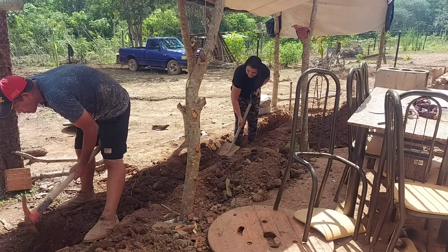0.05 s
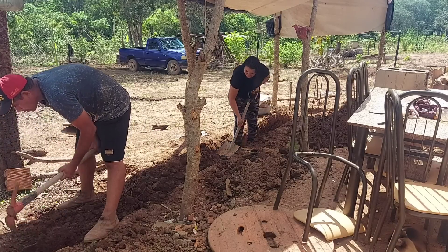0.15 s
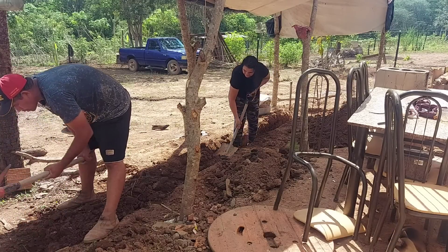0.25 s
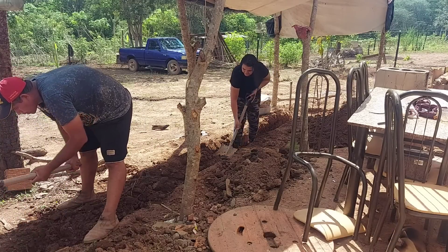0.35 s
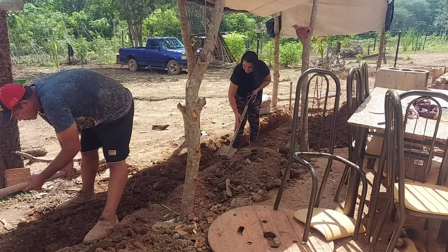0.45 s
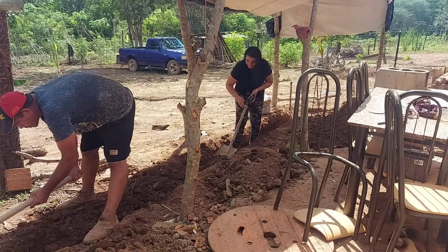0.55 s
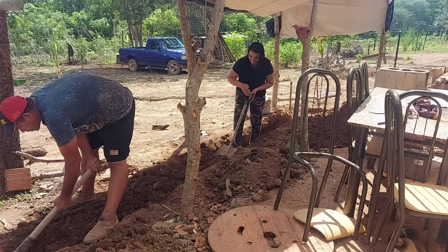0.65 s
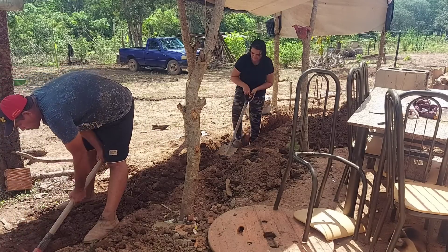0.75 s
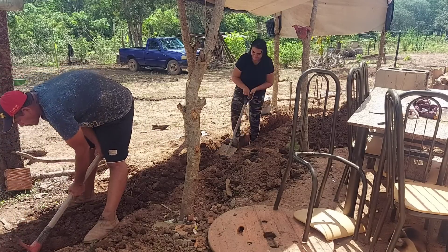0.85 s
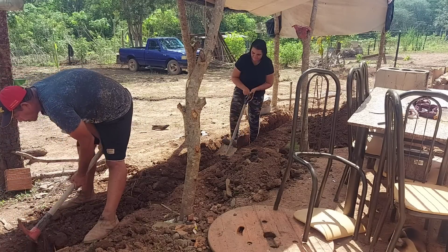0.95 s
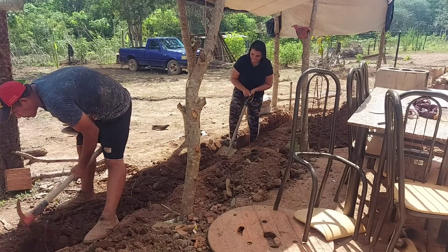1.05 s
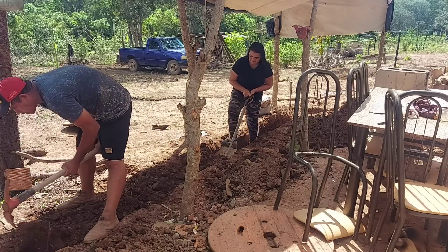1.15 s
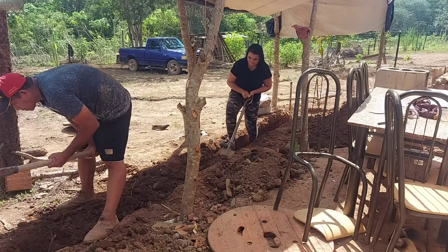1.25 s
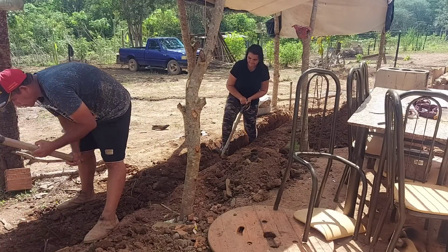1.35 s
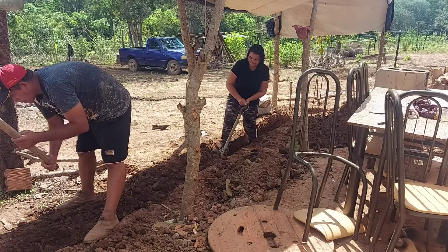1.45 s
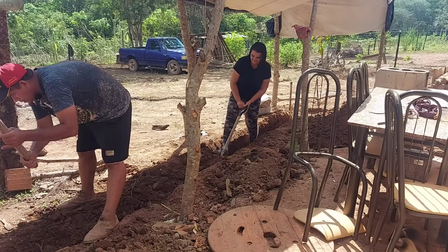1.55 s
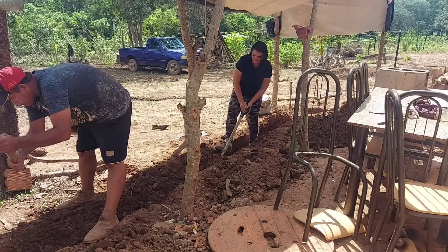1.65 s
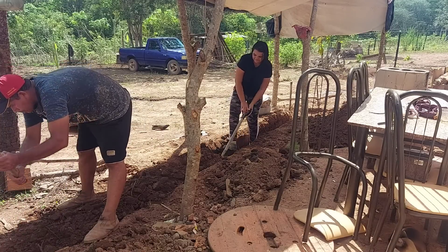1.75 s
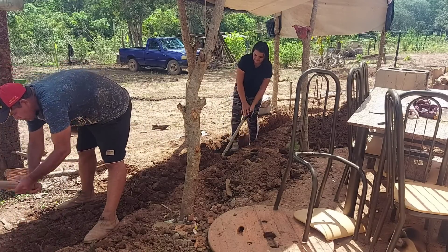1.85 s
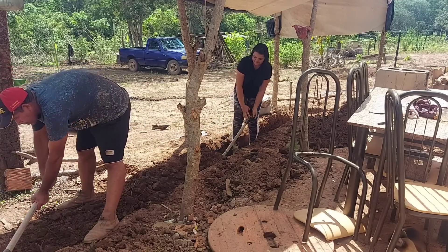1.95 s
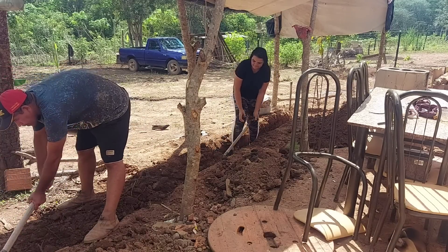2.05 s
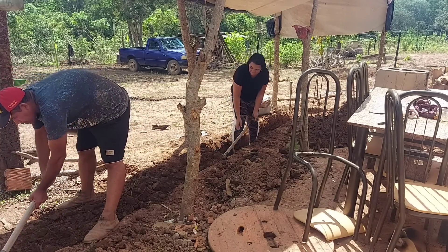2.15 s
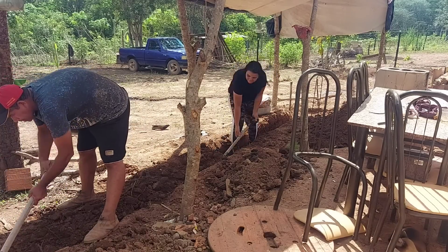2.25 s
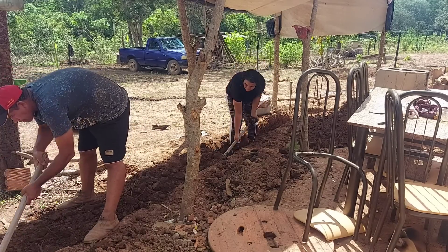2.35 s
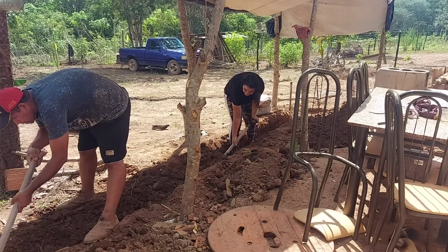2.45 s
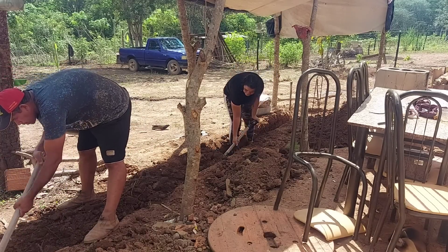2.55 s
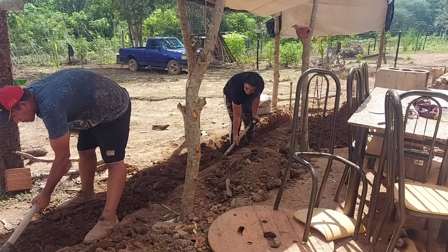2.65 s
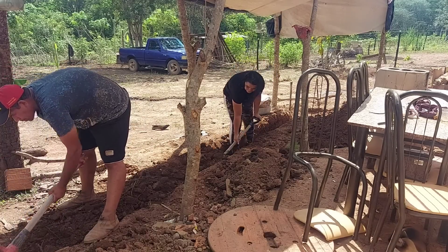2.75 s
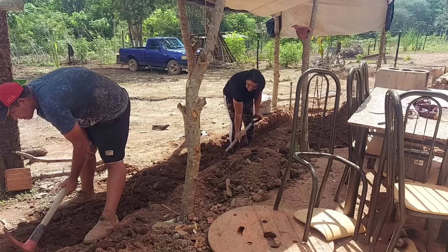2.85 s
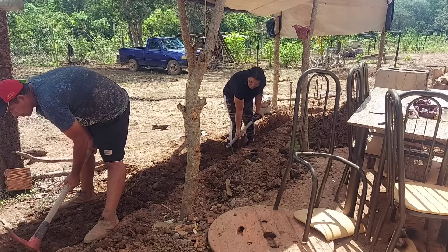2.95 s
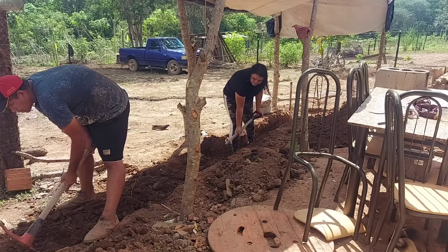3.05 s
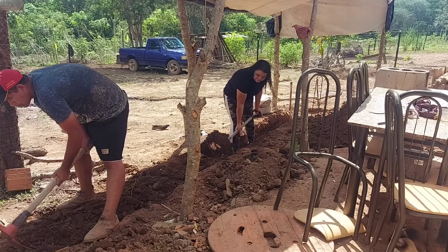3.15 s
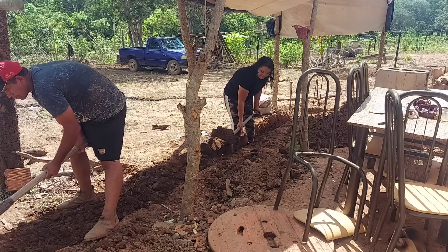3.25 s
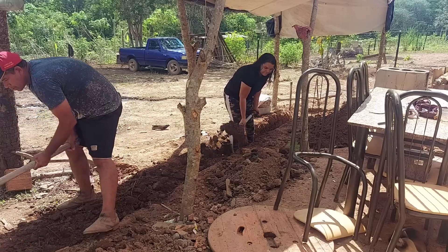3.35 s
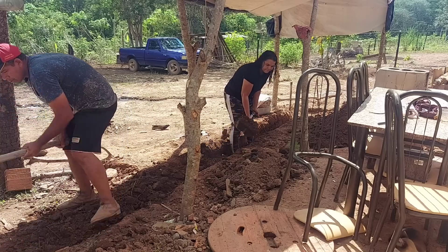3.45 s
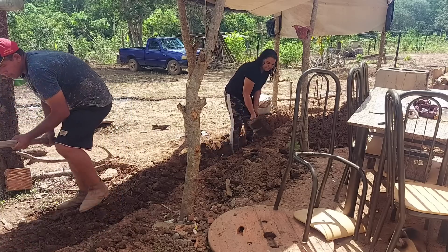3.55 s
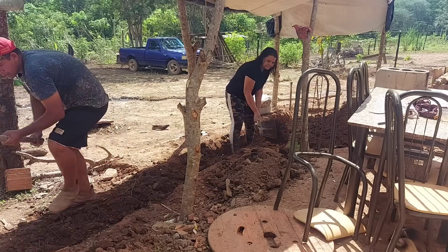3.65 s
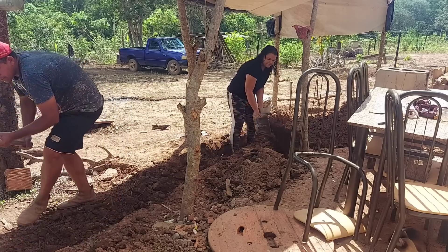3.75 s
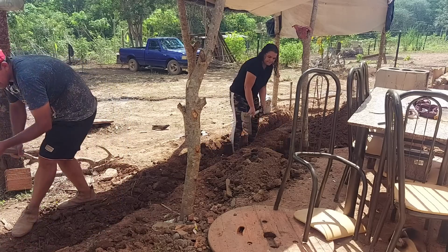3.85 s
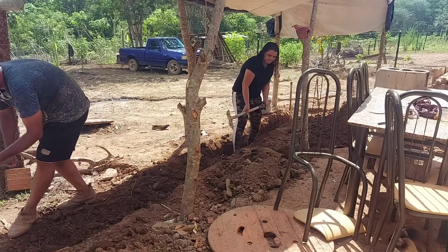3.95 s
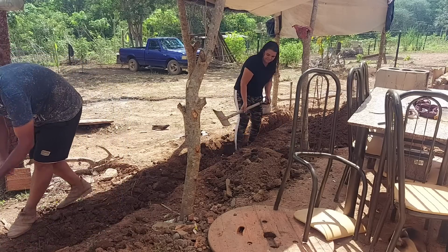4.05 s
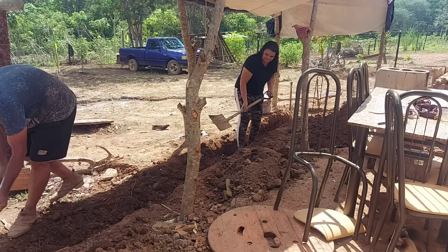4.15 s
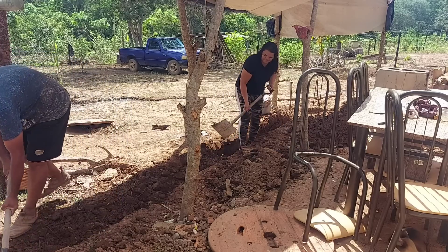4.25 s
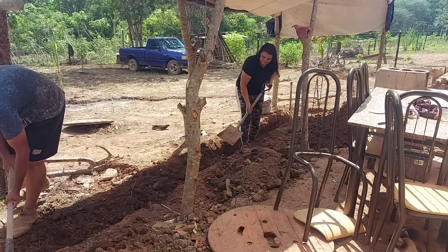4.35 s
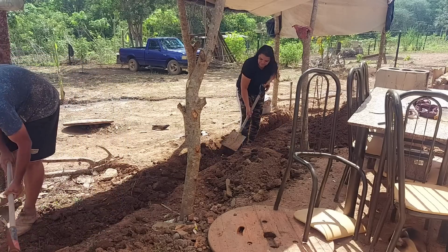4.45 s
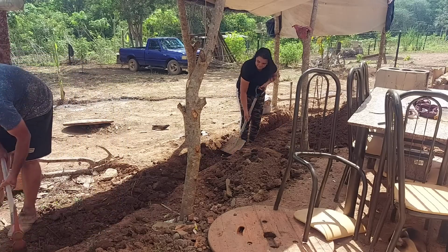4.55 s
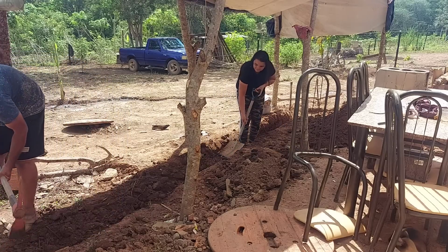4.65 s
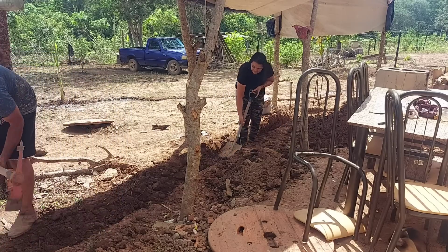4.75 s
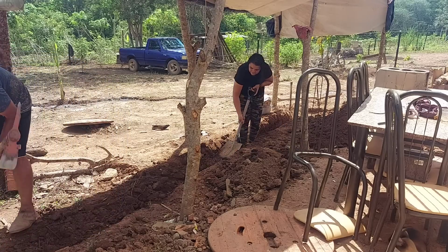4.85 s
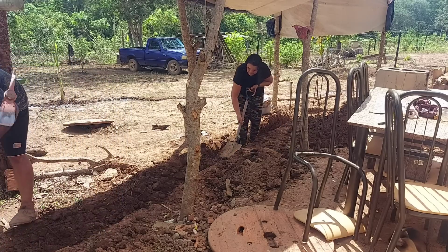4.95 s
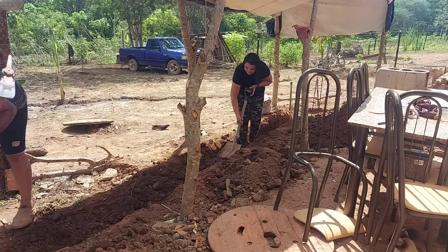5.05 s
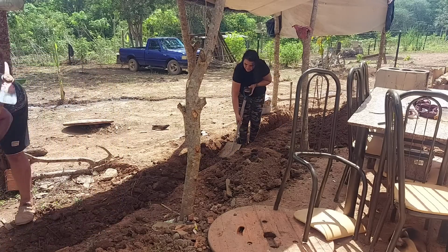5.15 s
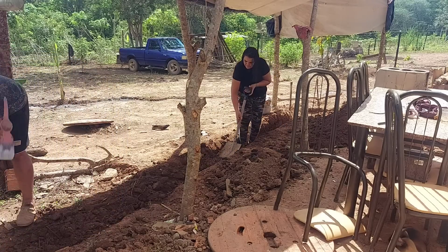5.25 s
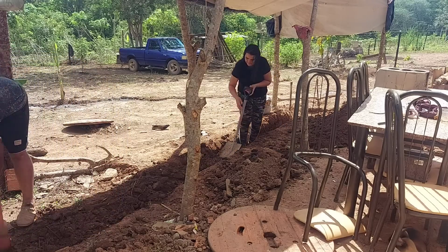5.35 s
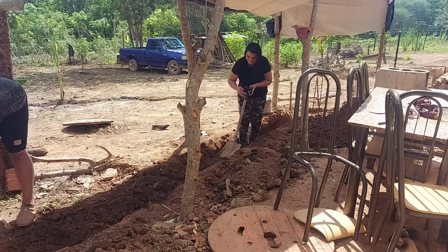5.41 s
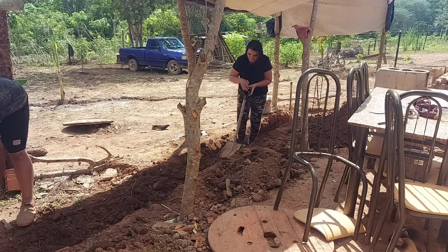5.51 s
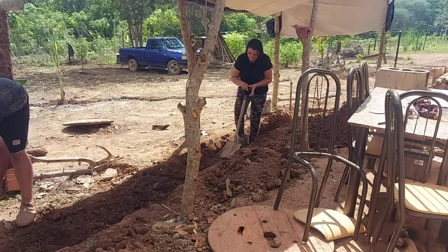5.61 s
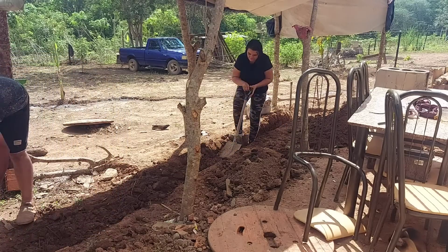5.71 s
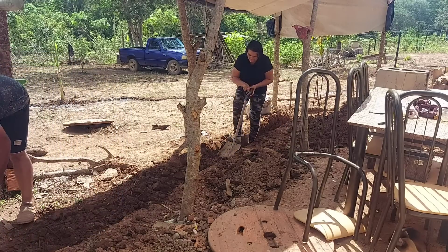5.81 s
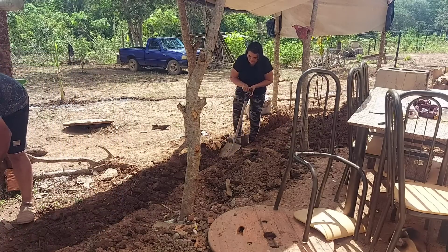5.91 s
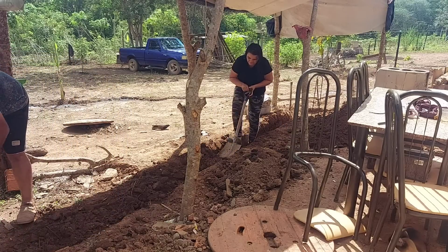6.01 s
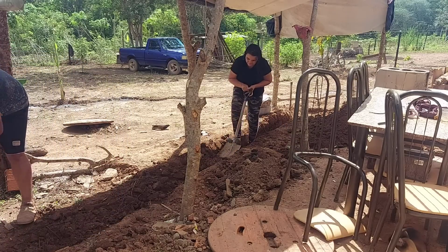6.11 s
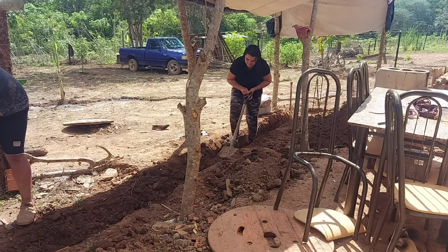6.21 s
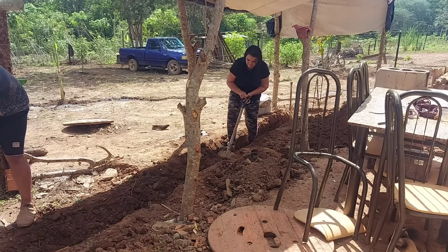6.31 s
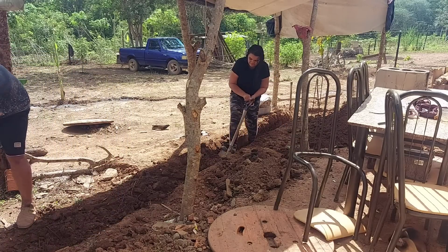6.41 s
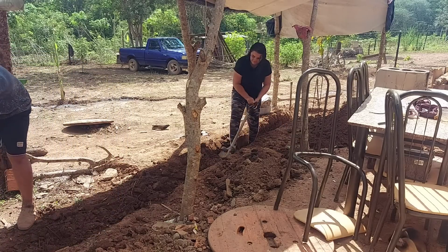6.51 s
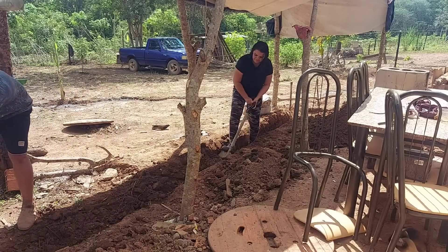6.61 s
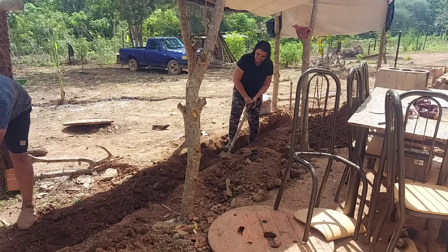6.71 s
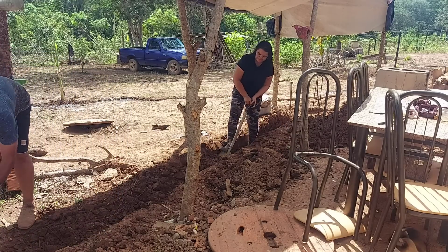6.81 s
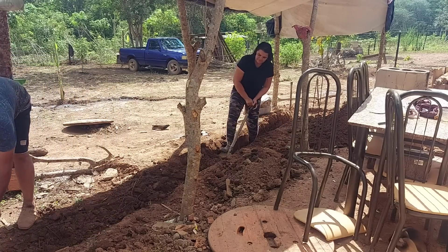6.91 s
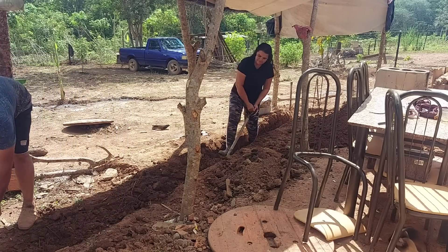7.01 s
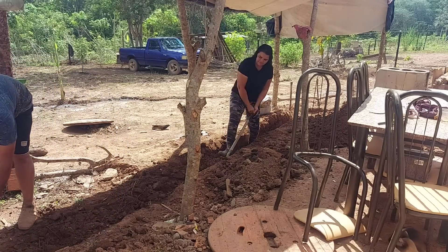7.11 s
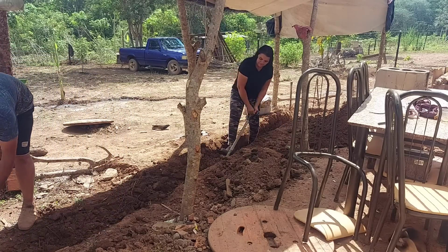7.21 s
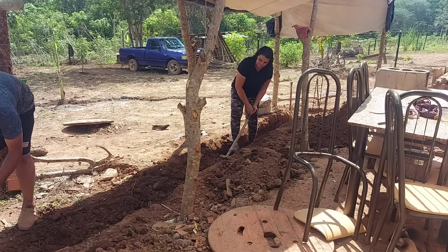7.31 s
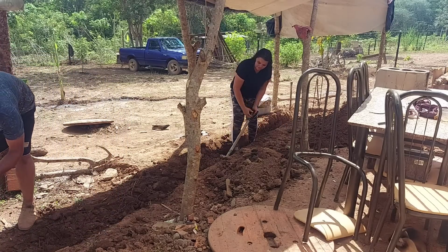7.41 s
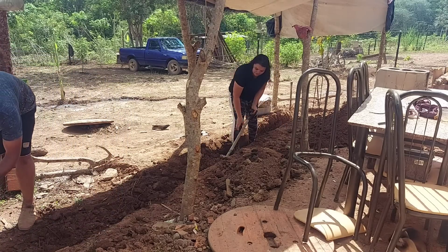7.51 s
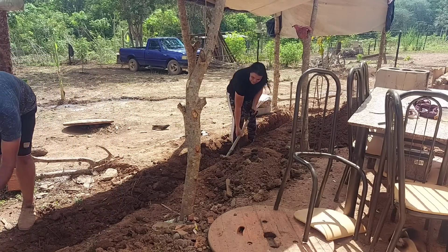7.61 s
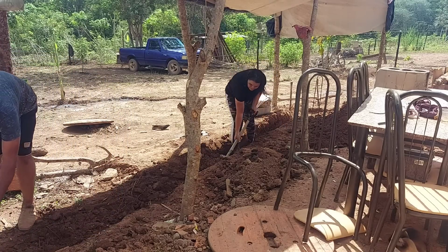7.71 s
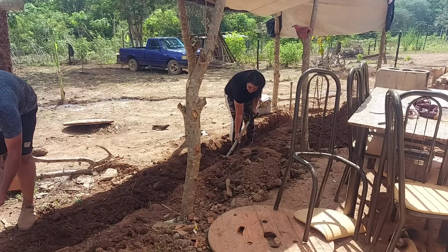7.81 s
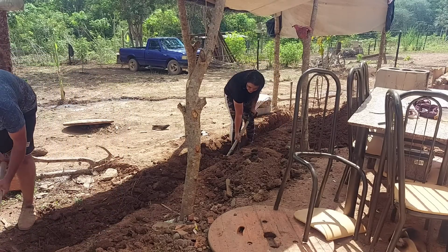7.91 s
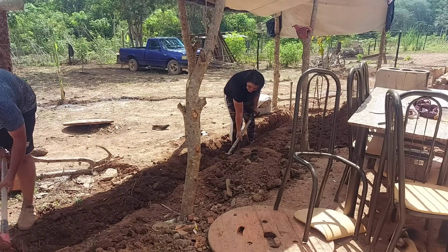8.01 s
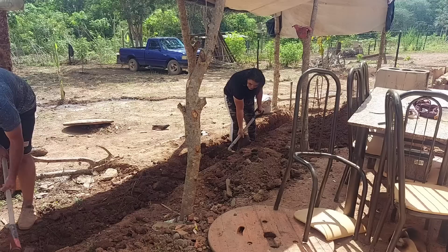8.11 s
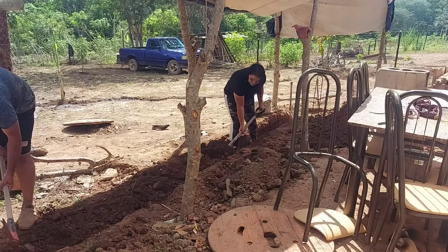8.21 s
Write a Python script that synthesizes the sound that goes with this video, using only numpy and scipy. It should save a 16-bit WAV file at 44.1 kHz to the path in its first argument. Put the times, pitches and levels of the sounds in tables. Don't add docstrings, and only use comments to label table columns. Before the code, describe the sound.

Outdoors, a pick cracks into dry earth with ringing and thuds while a shovel scrapes and tips crumbly soil, soft wind bumping the microphone.

```python
import sys
import numpy as np
from scipy import signal
from scipy.fft import rfft, irfft
from scipy.io import wavfile
from scipy.ndimage import uniform_filter1d

SR = 44100
rng = np.random.default_rng(int(sys.argv[2]) if len(sys.argv) > 2 else 0)


def convert_level_to_amplitude(level_db):
    exponent = np.asarray(level_db, float) / 20
    return 10 ** exponent


def dump(signal):
    limited = np.clip(np.atleast_2d(signal).T, -1, 1)
    pcm = np.round(limited * 32767).astype(np.int16)
    wavfile.write(sys.argv[1], SR, pcm)


N = 364707
PORT_LAG = 10
STEP = 16


def unit(x):
    return x / np.sqrt(np.mean(x ** 2))


def resonate(x, hz, width_hz):
    b, a = signal.iirpeak(hz, hz / width_hz, SR)
    return signal.lfilter(b, a, x)


def modes(x, table):
    out = 0
    for hz, db, t60_s in table:
        pole = np.exp(2j * np.pi * hz / SR - np.log(1000) / (t60_s * SR))
        out = out + convert_level_to_amplitude(db) * signal.lfilter([1], [1, -pole], x).imag
    return out


def body(x, table):
    out = 0
    for k, (hz, width_hz, db) in enumerate(table):
        once = resonate(x, hz, 1.5 * width_hz)
        out = out + (-1) ** k * convert_level_to_amplitude(db) * resonate(once, hz, 1.5 * width_hz)
    return unit(out)


def colour(x, table):
    hz, db = np.transpose(table)
    bins_hz = np.arange(N // 2 + 1) * SR / N + 1
    return irfft(rfft(x) * convert_level_to_amplitude(np.interp(np.log(bins_hz), np.log(hz), db)), N)


def grains(shape, share, spread_db):
    hits = rng.random(shape) < share
    size = convert_level_to_amplitude(spread_db * np.minimum(rng.exponential(size=shape), 4))
    return hits * rng.standard_normal(shape) * size


def add(out, s, sound, db):
    start = int(s * SR)
    sound = sound[max(-start, 0):N - start]
    first = max(start, 0)
    out[first:first + len(sound)] += sound * convert_level_to_amplitude(db) / np.abs(sound).max()


def swell(s, db, rise_s, fall_s):
    t = np.arange(0, N + STEP, STEP) / SR - s
    away = np.where(t < 0, -t / max(rise_s, .004), t / max(fall_s, .004))
    return convert_level_to_amplitude(2 * db - 40 * away)


def swells(table):
    return sum(swell(*row) for row in table)


def gain_curve(power):
    return np.sqrt(np.repeat(power, STEP, axis=-1)[..., :N])


# f/Hz, level/dB per Hz
AIR_SPECTRUM = [(18, -35), (30, 5), (75, 3), (187, -14.5), (300, -11.5), (534, -18.5), (730, -25.5),
                (2700, -30), (3510, -23), (4440, -28.5), (5770, -30), (7700, -12.5), (8550, -22.5),
                (14000, -22), (15600, -34.5)]


def air():
    hiss = rng.standard_normal((2, N))
    bass = signal.sosfilt(signal.butter(1, 500, fs=SR, output="sos"), hiss[0] - hiss[1])
    hiss = hiss + 0.13 * np.array([-bass, bass])
    return convert_level_to_amplitude(-65) * unit(colour(hiss, AIR_SPECTRUM))


# t/s, level/dB, 20 dB rise/s, 20 dB fall/s
TREMORS = [(.056, -60, 0.066, 0.27), (.83, -49.5, 0.044, 0.06), (1.47, -44.5, 0.079, 0.049),
           (1.712, -59.5, 0.072, 0.061), (2.15, -43.5, 0.066, 0.075), (2.25, -52.5, .1, 0.18),
           (2.76, -66, 0.18, 0.51), (3.9, -62, 1, 1), (4.33, -62, 0.17, 0.16), (4.78, -56, 0.07, 0.17),
           (5.579, -39.5, .04, 0.027), (5.682, -55.5, 0.088, 0.076), (5.93, -46.5, 0.059, 0.04),
           (6.432, -47.5, 0.15, 0.039), (6.812, -66, 0.041, 0.11), (7.09, -46.5, 0.04, 0.098),
           (7.15, -60.5, .05, 0.18), (7.613, -52, 0.031, 0.072), (7.81, -68, .1, 0.25)]


def ground_power():
    return convert_level_to_amplitude(2 * -76) + swells(TREMORS)


# f/Hz, width/Hz, level/dB
RUMBLE = [(53.6, 21, -2), (107.5, 38, -3.5)]


def rumble(power):
    low = signal.butter(4, 150, fs=SR, output="sos")
    return gain_curve(power) * signal.sosfilt(low, body(rng.standard_normal(N), RUMBLE))


# t/s, level/dB, 20 dB rise/s, 20 dB fall/s
PUFFS = [(.55, -52, 0.2, 0.2), (1.712, -62, 0.06, 0.046), (2., -56.5, 0.28, 0.076), (2.15, -39, 0.1, 0.032),
         (2.46, -54, 0.39, 0.3), (2.76, -54, 0.069, 0.3), (3., -45.5, 0.38, 0.34), (3.43, -57.5, 1, 0.29),
         (4.03, -49, 0.2, .2), (4.159, -34, 0.24, 0.031), (4.4, -48, 0.39, 0.049),
         (4.73, -50.5, 0.048, 0.19), (4.9, -49.5, 0.14, 0.13), (5.15, -55, 0.19, 0.17),
         (5.43, -55.5, 0.37, 0.054), (5.58, -40, 0.041, 0.062), (5.75, -57.5, .1, 0.37),
         (7.355, -50, 0.074, 0.32), (7.478, -51, 0.27, 0.085), ]
# f/Hz, width/Hz, level/dB
WIND = [(55.6, 30, 3), (98.4, 200, -19.5)]


def wind(ground):
    power = convert_level_to_amplitude(2 * -8) * ground + swells(PUFFS)
    low = signal.butter(4, 150, fs=SR, output="sos")
    return gain_curve(power) * signal.sosfilt(low, body(grains(N, .004, 1.5), WIND))


# t/s, crack level/dB, tool ring and ground thud level/dB re crack
BLOWS = [(0.0034, -22.5, -10, -26), (0.7359, -13.5, -18, -21.5), (0.801, -26.5, -7, -25),
         (2.061, -21, -7, -4), (5.485, -13.5, -5.5, -5), (7.0054, -26, 1, -6.5)]
# bite/s, crack dulling/(dB/kHz), thud f/Hz, thud delay/s, thud t60/s
LANDINGS = [(0.014, 1.5, 194, 0.0147, 0.12), (0.036, -1, 78, 0.0284, 0.13), (0.0074, 6.5, 150, 0.022, 0.14),
            (0.016, 6.5, 94, 0.011, 0.14), (0.004, 3, 64.4, 0.0177, 0.12), (0.0022, 1.5, 93, 0.0493, 0.09)]
# f/Hz, level/dB, t60/s
RINGS = [
    [(406.6, -4, 0.16), (920, -10, 0.058), (1690, -26, 0.03), (2730, -9, 0.028), (3640, -3, .03),
     (4115, 9, 0.036), (4760, 3, 0.037), (4960, -1, 0.033)],
    [(306, -11, 0.08), (674, 12.5, 0.055), (1060, -21, 0.065), (1260, 10.5, 0.057), (1590, -1, 0.13),
     (2250, -16, .06), (3930, 5, 0.058), (4533, -20, 0.055), (8050, -4, .05), (10100, -7, .05)],
    [(297, 0, 0.044), (594, -9, 0.041), (803, -11, 0.073)],
    [(305, 6.5, 0.066), (650, -7.5, 0.078), (850, -3.5, 0.099), (1150, -0.5, 0.054), (1460, -0.5, 0.07),
     (490, -22, .05), (2300, -14, .06), (4450, -12, .06), (4834, -22, .06)],
    [(301.5, 0.5, 0.13), (590, -5, 0.13), (780, 1, 0.061), (1042, 5, 0.02), (1124, 0, 0.066),
     (1770, -20.5, 0.062), (4314, 0, 0.018), (4780, -1.5, 0.03), (8800, 2, .008)],
    [(330.5, 8, 0.086), (688, 2.5, 0.12), (727, -1.5, 0.13), (820, -2, 0.048), (1078, 9, 0.032),
     (1660, -14, .05), (1316, -4, 0.037), (2330, -5, 0.039), (3100, -18, 0.046), (4750, -7, 0.054)],
]
RING_LATE_S = (-0.0018, .007, .003, -.004, 0.00085, 0.00029)


def pick():
    out, t = np.zeros(N), np.arange(SR // 3) / SR
    bright = GRIT + [(hz, width_hz, db + 2) for hz, width_hz, db in DUST]
    for blow, landing, rings, ring_late_s in zip(BLOWS, LANDINGS, RINGS, RING_LATE_S):
        s, db, ring_db, thud_db = blow
        bite_s, dull_db_khz, thud_hz, thud_late_s, thud_t60_s = landing

        crust = np.exp(-t / 0.002) * rng.standard_normal(len(t))
        crust += 0.2 * np.exp(-t / bite_s) * grains(len(t), 0.24, 2.5)
        crack = 0
        for hz, width_hz, band_db in bright:
            crack = crack + convert_level_to_amplitude(band_db - dull_db_khz * hz / 1000) * resonate(crust, hz, width_hz)
        add(out, s, crack, db + 2)

        force = np.exp(-(t / bite_s) ** 2) * grains(len(t), .08, 2.0)
        force += 3 * np.exp(-((t - .0006) / 0.000067) ** 2)
        add(out, s + ring_late_s, modes(force, rings), db + ring_db + 8.0)

        push = np.exp(-((t - thud_late_s) / 0.0012) ** 2)
        push += 0.21 * np.exp(-((t - 0.32 * thud_late_s) / 0.0031) ** 2)
        thud = modes(push, [(thud_hz, 0, thud_t60_s), (1.4 * thud_hz, -11, .2)])
        add(out, s, thud, db + thud_db + 3.0)
    return out


# t/s, level/dB, length/s, f/Hz
CHIPS = [(.0055, -30, 0.0016, 4450), (.006, -35, 0.0024, 2760), (.742, -38, 0.0025, 4040),
         (.752, -40, 0.0068, 1240), (.754, -27, 0.0087, 308), (.793, -43, 0.0058, 2780),
         (0.792, -39.5, .004, 590), (.80, -44, .002, 4400), (0.856, -53, 0.0051, 477),
         (1.385, -48, .012, 410), (1.455, -48, .004, 2100), (2.062, -34.5, 0.0032, 4530),
         (2.063, -37.5, 0.0022, 5400), (2.069, -39.5, 0.0032, 2860), (4.338, -56, .004, 2750),
         (5.4868, -24, 0.0018, 4220), (4.664, -55.5, 0.013, 449), (4.755, -63.5, 0.0046, 2180),
         (4.772, -51.5, 0.0046, 426), (4.834, -44, 0.0042, 933), (4.83, -57, .006, 2680),
         (4.849, -63, .008, 2020), (5.4859, -27.5, .0012, 7800), (5.4879, -25.5, .0013, 8820),
         (5.49, -33, .0025, 7100), (5.489, -27.5, .002, 720), (5.497, -38, .003, 2750),
         (5.928, -68, .004, 2050), (6.518, -47, .004, 2800), (6.407, -31, 0.0027, 410),
         (6.432, -33.5, 0.0046, 165), (6.437, -36, .005, 396), (6.496, -36, 0.0048, 1590),
         (6.484, -41, 0.0045, 1960), (6.515, -43, .006, 2150), (7.011, -50, .003, 2700),
         (7.02, -31.5, 0.0043, 814), (7.033, -22, 0.0075, 86), (7.036, -44.5, .005, 1720),
         (7.39, -62, .003, 1610), (7.442, -61, .004, 1630)]


def chips():
    out, t = np.zeros(N), np.arange(SR // 10) / SR - .05
    for s, db, length_s, hz in CHIPS:
        add(out, s + t[0], np.exp(-(t / length_s) ** 2) * np.sin(2 * np.pi * hz * t), db)
    return out


# t/s, level/dB, f/Hz, length/s
SKATES = [(0.01, -43, 2930, 0.017), (0.312, -55.5, 2500, 0.033), (0.314, -53, 4400, 0.02),
          (0.428, -54.5, 4760, 0.027), (0.429, -60.5, 2150, 0.07), (0.819, -44, 2720, 0.024),
          (1.109, -65.5, 2100, 0.036), (1.127, -56, 4900, 0.048), (1.749, -58.5, 5200, 0.067),
          (2.762, -59.5, 3940, 0.035), (3.802, -62.5, 1870, 0.053), (4.824, -44.5, 2670, .012),
          (4.833, -54.5, 1800, 0.054), (6.493, -37, 1920, 0.0097), (6.509, -39.5, 2300, 0.019),
          (6.518, -38.5, 3020, 0.022), (7.441, -59.5, 1590, 0.057), (7.471, -55, 2100, 0.0062)]
# t/s, level/dB, f/Hz, length/s, t60/s
DRAGS = [(0.766, -43, 307, 0.0056, 0.06), (1.433, -37, 433, 0.033, 0.063), (3.89, -55.5, 657, 0.025, 0.04),
         (4.353, -49.5, 1260, 0.0051, 0.026), (6.501, -35.5, 850, 0.028, 0.02),
         (6.513, -34, 515, 0.02, 0.027), (1.7, -70, 850, 0.011, 0.024), (7.19, -69, 1330, 0.025, 0.045)]


def scrapes():
    out, t = np.zeros(N), np.arange(SR // 4) / SR
    skates = [(s, db, hz, length_s, 19 / hz) for s, db, hz, length_s in SKATES]
    for s, db, hz, length_s, t60_s in DRAGS + skates:
        drag = np.exp(-((t - .1) / length_s) ** 2) * grains(len(t), .3, 1.5)
        add(out, s - .1, modes(drag, [(hz, 0, t60_s), (1.066 * hz, -3, t60_s)]), db)
    return out


# t/s, level/dB, 20 dB fall/s, fineness/dB
SPRAYS = [(0.018, -47.5, 0.0778, 11), (0.751, -27, 0.0642, -8), (0.813, -39, 0.0672, 0.5),
          (2.066, -33, 0.08, 2.5), (4.329, -51, 0.185, -2.5), (5.498, -29, 0.0661, -1.5),
          (7.015, -26.5, 0.0448, -8.5)]
# t/s, level/dB, 20 dB rise/s, 20 dB fall/s, fineness/dB
THROWS = [(1.43, -30, 0.089, 0.085, -4), (1.478, -31, 0.13, 0.029, -12), (2.79, -60, 0.18, 0.099, 0.5),
          (2.968, -58.5, 0.13, 0.5, -6), (3.85, -57, 0.53, 0.56, -11), (3.95, -46.5, 0.27, 0.2, -11.5),
          (4.025, -53.5, 0.024, 0.26, 0), (4.83, -55.5, 0.12, 0.14, 7), (6.341, -48.5, 0.081, 0.22, 4.5),
          (6.414, -32, 0.095, 0.075, -4.5), (6.495, -27.5, 0.081, 0.042, -24),
          (6.52, -33.5, 0.054, 0.082, -17), (7.443, -49, 0.17, 0.083, -4.5), (7.49, -55, 0.046, 0.14, -1.5),
          (7.906, -56, 0.1, 0.095, -8.5)]
# t/s, level/dB, 20 dB rise/s, 20 dB fall/s
TRICKLES = [(.31, -57.5, 0.27, .4), (.414, -49, 0.27, .18), (1.05, -55, 0.072, 0.84),
            (1.752, -59.5, 0.95, 0.089), (2.35, -56, 0.2, 1), (3.2, -67, 0.46, 0.83), (4.31, -58, 0.27, .1),
            (4.66, -54, 0.032, 0.25), (5.05, -55.5, 0.04, 0.36), (5.138, -50.5, 0.24, 0.16),
            (5.888, -57.5, 0.028, 0.23), (6.2, -67, 0.48, 0.33), (7.2, -52, 0.4, 0.06),
            (7.72, -57, 0.26, 0.25), (8.27, -55.5, 0.28, .3)]
# t/s, level/dB, 20 dB rise/s, 20 dB fall/s
SHIFTS = [(.236, -52.5, 0.014, 0.31), (.414, -47.5, 0.15, 0.087), (1.03, -55.5, .07, 0.34),
          (1.58, -60.5, 0.12, 0.59), (2.17, -52, .1, 0.13), (3.208, -53, 0.029, 0.15),
          (3.676, -59, 0.2, 0.46), (3.99, -45.5, 0.066, 0.14), (4.78, -44.5, 0.11, 0.1),
          (5.04, -55, .16, 0.32), (5.161, -42, 0.021, 0.11), (5.456, -59.5, 0.32, 0.075),
          (5.921, -53, 0.011, 0.22), (6.416, -26, 0.095, 0.1), (6.712, -52.5, 0.017, 0.11),
          (6.99, -73, 0.11, 0.087), (7.211, -50, 0.35, 0.034), (7.609, -39, 0.012, 0.042),
          (8.27, -61.5, 0.27, .1)]
# pan ring, crumble, grit, dust level/dB
SPRAY_DB = (2.5, 4, 1.5, 1)
SETTLE_DB = (-14.5, -5.5, 3.5, 0)
THROW_DB = (-1.3, -3.5, 2.1, 1.8)
TRICKLE_DB = (-16.5, -12, -2.8, -1.7)
SHIFT_DB = (-2, -19, -41, -24.5)
CREEP_DB = (-85.5, -72.5, -71.5, -69)
FINE_SHARE = (0.4, 0.0052, 1, 0.77)


def mix_power(levels_db, fine_db=0):
    return convert_level_to_amplitude(2 * (np.array(levels_db) + fine_db * np.array(FINE_SHARE)))[:, None]


def motion():
    spray_rise_s, tail_db, tail_longer = 0.0088, -15, 2.5
    power = mix_power(CREEP_DB) + mix_power(TRICKLE_DB) * swells(TRICKLES)
    power = power + mix_power(SHIFT_DB) * swells(SHIFTS)
    for s, db, rise_s, fall_s, fine_db in THROWS:
        power += mix_power(THROW_DB, fine_db) * swell(s, db, rise_s, fall_s)
    for s, db, fall_s, fine_db in SPRAYS:
        power += mix_power(SPRAY_DB, fine_db) * swell(s, db, spray_rise_s, fall_s)
        tail = swell(s, db + tail_db, spray_rise_s, tail_longer * fall_s)
        power += mix_power(SETTLE_DB, fine_db) * tail
    return gain_curve(power)


# f/Hz, width/Hz, level/dB
PAN = [(306, 127, -1), (392, 115, -3), (540, 142, -6)]
CRUMBLE = [(850, 384, 2.5), (1280, 290, 4), (1550, 670, 1.5), (2790, 2300, -1.5)]
GRIT = [(2740, 1080, -1), (4200, 830, 2), (4900, 1000, 2), (7000, 2800, -9)]
DUST = [(8000, 2900, -1), (10000, 2200, 4.5), (14000, 7200, -1.5)]


def soil():
    layers = ((PAN, .02, 0.6, 0), (CRUMBLE, .12, 0.14, PORT_LAG), (GRIT, .2, 0.098, 0), (DUST, .35, 0.29, 0))
    out = 0
    for drive, (table, share, alike, lag) in zip(motion(), layers):
        common, left, right = grains((3, N), share, 2.5)
        shared = np.sqrt(alike) * np.array([common, np.roll(common, lag)])
        crumbs = shared + np.sqrt(1 - alike) * np.array([left, right])
        out = out + convert_level_to_amplitude(-10.5) * drive * body(crumbs, table)
    return out


# t/s, level/dB, f/Hz, t60/s
CLODS = [(0.237, -58, 418, 0.062), (.743, -47, 306, 0.11), (.787, -49, 484, 0.038),
         (1.017, -66.5, 430, 0.077), (2.179, -58, 246, 0.027), (3.206, -64, 354, 0.023),
         (3.661, -60, 396, 0.09), (3.743, -63.5, 450, 0.13), (3.957, -47.5, 292, 0.084),
         (3.984, -45.5, 304, 0.032), (4.331, -47, 318, 0.077), (4.766, -66.5, 427, 0.063),
         (5.155, -51, 310, 0.1), (5.924, -50, 374, 0.03), (6.336, -46, 427, 0.043),
         (6.364, -44, 374, 0.035), (6.389, -43, 410, 0.035), (6.406, -52, 392, .04),
         (6.416, -47.5, 400, 0.056), (6.428, -38.5, 170, 0.03), (6.465, -38.5, 433, 0.084),
         (6.71, -66.5, 400, 0.059), (7.359, -62.5, 306, 0.034), (7.385, -61, 610, 0.02),
         (7.41, -58.5, 575, 0.015), (7.441, -60, 336, 0.024), (7.464, -59, 1150, 0.018),
         (7.553, -65.5, 374, .03), (7.596, -49, 286, 0.039), (7.617, -50.5, 260, 0.028),
         (8.215, -71, 361, 0.098)]


def clods():
    out, t = np.zeros(N), np.arange(SR // 4) / SR
    contact = np.hanning(int(0.00069 * SR) + 3)
    for s, db, hz, t60_s in CLODS:
        fall = np.exp(-t / 0.017) * (grains(len(t), 0.051, 1.94) + 4 * (t == 0))
        fall = np.convolve(fall, contact)[:len(t)]
        plate = [(hz, 0, t60_s), (1.826 * hz, -7, 0.39 * t60_s), (3.0 * hz, -11, 0.078 * t60_s)]
        add(out, s, modes(fall, plate), db + 5.0)
    return out


# t/s, level/dB, length/s, first f/Hz, last f/Hz
HUMS = [(0.819, -47, 0.015, 2714, 2675), (.839, -47, 0.003, 1500, 1520), (6.43, -46, 0.0067, 2540, 2490),
        (1.435, -33.5, 0.027, 415, 404.4), (1.435, -48.5, 0.015, 778, 780),
        (1.58, -57.5, 0.067, 238, 199.4), (2.22, -61.5, 0.087, 628, 625), (4.69, -57.5, 0.022, 458, 430),
        (4.668, -64.5, 0.037, 1625, 1670), (4.70, -73, 0.072, 2120, 2150), (4.75, -59, 0.032, 525, 540),
        (4.77, -55, .02, 465.5, 439), (4.828, -52, 0.018, 520, 518), (4.812, -53.5, 0.01, 984, 970),
        (4.842, -53, 0.019, 920, 903), (4.825, -63, 0.02, 2690, 2610), (4.855, -67, 0.016, 2020, 1960),
        (5.048, -55.5, 0.02, 398, 383), (5.09, -62, 0.018, 475, 470), (6.34, -45, 0.011, 410, 400),
        (6.393, -31, 0.0048, 401, 410), (6.419, -27.5, 0.0092, 408.2, 395), (6.493, -42, 0.016, 1560, 1623),
        (6.5, -48, 0.014, 2000, 2150), (6.515, -37.5, 0.018, 481, 470), (7.47, -58, 0.0044, 1600, 1590),
        (7.47, -60, 0.005, 2130, 2100), (5.487, -32, 0.0015, 4200, 4290), (5.4895, -33, 0.0022, 4850, 4960),
        (.743, -38, 0.0042, 4000, 4050), (1.47, -45, 0.024, 170, 161), (4.79, -57, 0.022, 205, 201),
        (5.04, -60.5, 0.035, 200, 178.4), (4.333, -46, 0.004, 1270, 1260), (4.34, -46.5, 0.0073, 320, 305),
        (6.74, -76, 0.013, 1550, 1550)]


def pan():
    out, t = np.zeros(N), np.arange(SR // 2) / SR - .25
    wobble_db, wobble_n = 5.5, int(0.0099 * SR)
    for s, db, length_s, first_hz, last_hz in HUMS:
        hz = first_hz + (last_hz - first_hz) * np.clip(.5 + t / (2 * length_s), -.5, 1.5)
        wobble = uniform_filter1d(rng.standard_normal(len(t)), wobble_n)
        wobble = unit(uniform_filter1d(wobble, wobble_n))
        level = np.exp(-(t / length_s) ** 2) * convert_level_to_amplitude(wobble_db * wobble)
        add(out, s + t[0], level * np.sin(2 * np.pi * np.cumsum(hz) / SR), db)
    return out


# t/s, level/dB
PEBBLES = [(2.3487, -55), (4.3287, -68), (5.879, -57), (5.924, -63.5), (6.2728, -54.5), (7.8712, -56.5),
           (7.9697, -64)]


def pebbles():
    out, t = np.zeros(N), np.arange(SR // 4) / SR
    for s, db in PEBBLES:
        tick = np.exp(-t / 0.00037) * rng.standard_normal(len(t))
        add(out, s, np.diff(tick, 2), db + 19.5)
    return out


# t/s, level/dB, f/Hz
EDDIES = [(2.743, -43, 60.7), (2.771, -42, 65), (2.877, -39, 65), (2.93, -40.5, 55), (3.006, -35, 66.6),
          (3.042, -56, 65), (3.08, -48, 59.6), (4.03, -55, 65), (4.085, -43, 60), (4.132, -30.5, 70),
          (4.164, -39, 60.3), (4.889, -37, 55.4), (4.945, -46, 65.7), (7.331, -43, 85.5), (7.366, -38, 84),
          (7.448, -39.5, 88.5), (7.547, -49, 79.5)]


def eddies():
    out, t = np.zeros(N), np.arange(SR // 5) / SR - .1
    for s, db, hz in EDDIES:
        swing = np.exp(-(t * hz / 0.82) ** 2) * np.cos(2 * np.pi * hz * t)
        add(out, s + t[0], swing, db)
    return out


# f/Hz, left lead/rad
PORT_TURN = [(120, 0), (300, -.6), (600, -.1), (1050, .9), (1900, 0.1)]


def shelter(aside, ahead, tarp_db, tarp_s):
    t = np.arange(4096) / SR
    scatter = rng.standard_normal((2, len(t))) * np.exp(-t / tarp_s) * (t > .0015)
    band = signal.butter(2, (1100, 11000), "band", fs=SR, output="sos")
    scatter = signal.sosfilt(band, scatter)
    echo = convert_level_to_amplitude(tarp_db) * scatter / np.linalg.norm(scatter, axis=1, keepdims=True)

    left = aside + ahead
    hz, turn_rad = np.transpose(PORT_TURN)
    lag_rad = np.interp(np.arange(N // 2 + 1) * SR / N, hz, turn_rad)
    right = irfft(rfft(np.roll(aside, PORT_LAG) + ahead) * np.exp(-1j * lag_rad), N)
    return np.array([left, right]) + signal.oaconvolve(left[None], echo, axes=1)[:, :N]


def scene():
    ground = ground_power()
    left_wind = np.outer([1, 0], wind(ground) + eddies())
    ahead = chips() + scrapes() + clods() + pan() + pebbles()
    tools = shelter(pick(), ahead, tarp_db=-4, tarp_s=0.0063)
    return air() + rumble(ground) + left_wind + tools + soil()


def band_limit(x):
    return signal.sosfilt(signal.butter(12, 16770, fs=SR, output="sos"), x)


# f/Hz, left minus right level/dB
PORTS = [(100, 1), (300, 3), (900, 4.5), (4500, -0.5), (6300, -2.5), (7500, -4), (8600, -2.5), (11000, 7),
         (15000, -4)]
# f/Hz, width/Hz, share
BAND_DIP = (3285, 550, 0.34)


def record(dry):
    left = colour(dry[0], [(hz, db / 2) for hz, db in PORTS])
    right = colour(dry[1], [(hz, -db / 2) for hz, db in PORTS])
    top_cut = signal.ellip(8, .2, 70, 15600, fs=SR, output="sos")
    bass_cut = signal.butter(3, 50, "high", fs=SR, output="sos")
    mix = signal.sosfilt(bass_cut, signal.sosfilt(top_cut, np.array([left, right])))
    hz, width_hz, share = BAND_DIP
    mix = mix - share * resonate(mix, hz, width_hz)
    return band_limit(mix)


dry = scene()
out = record(dry)
dump(out)
```